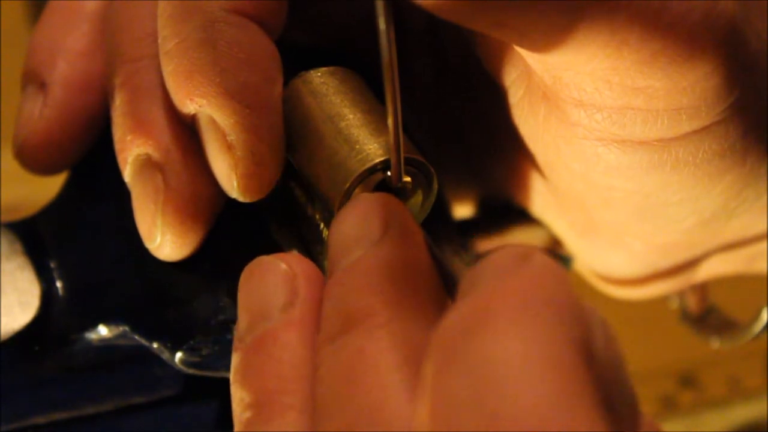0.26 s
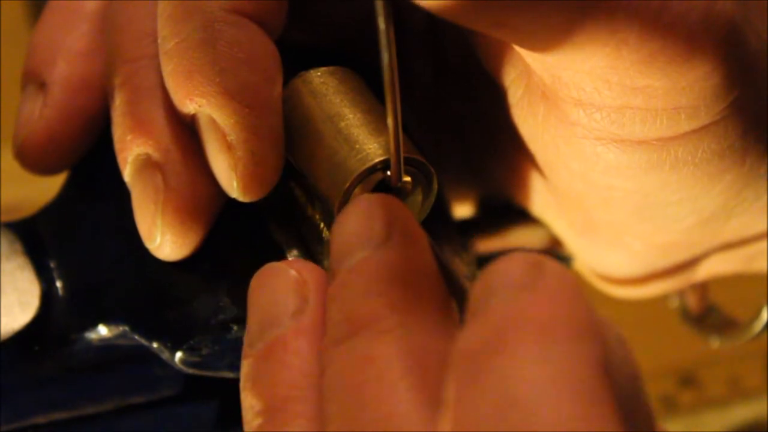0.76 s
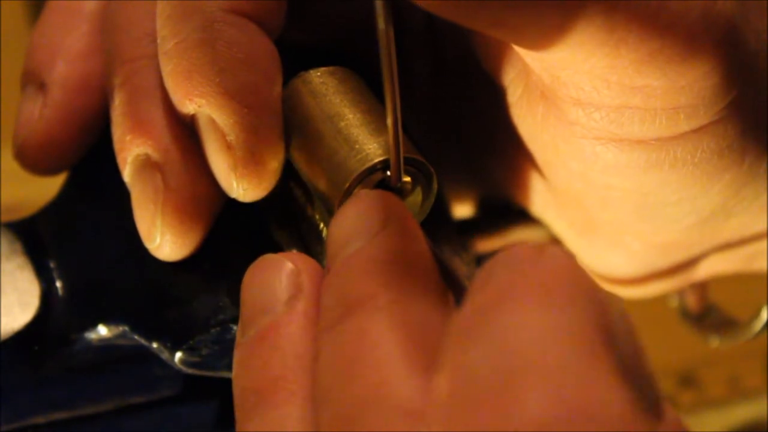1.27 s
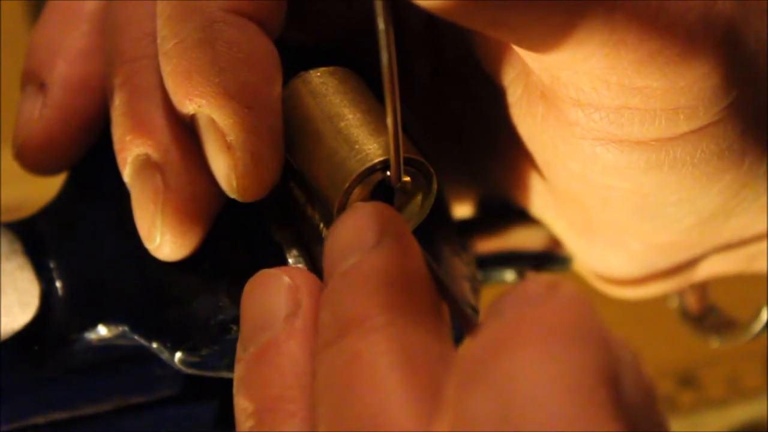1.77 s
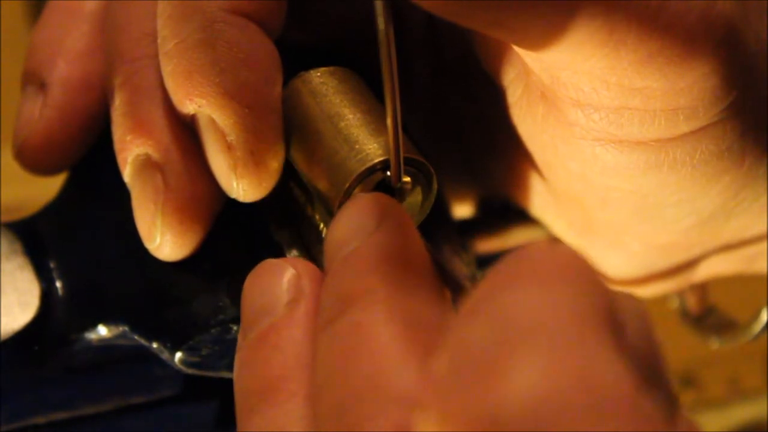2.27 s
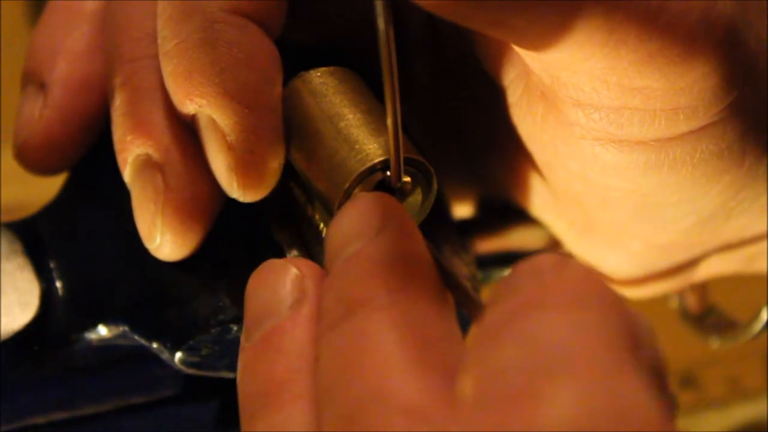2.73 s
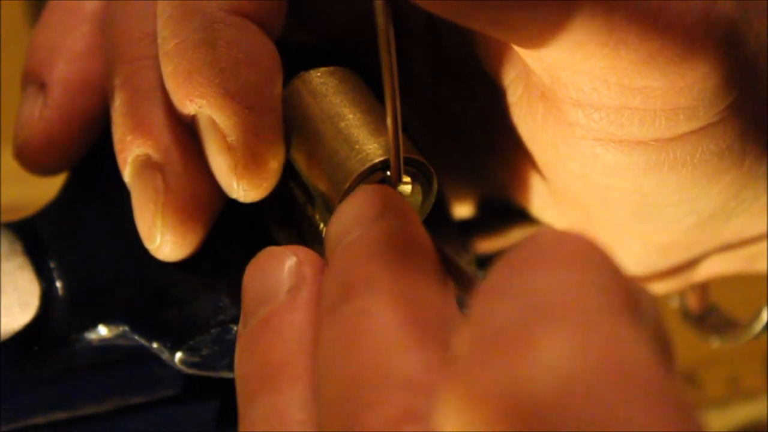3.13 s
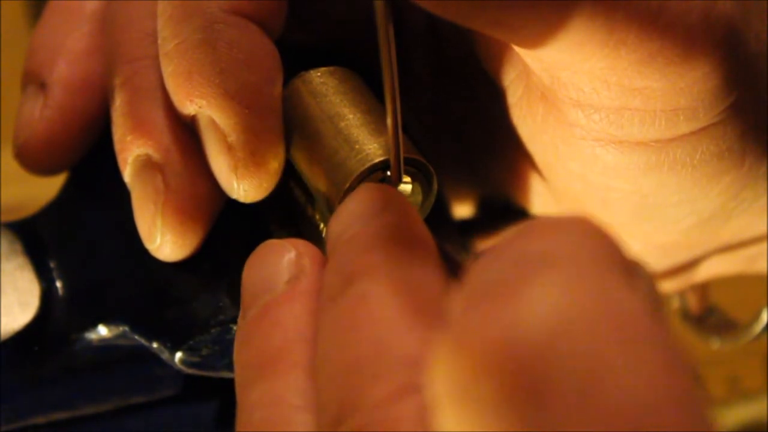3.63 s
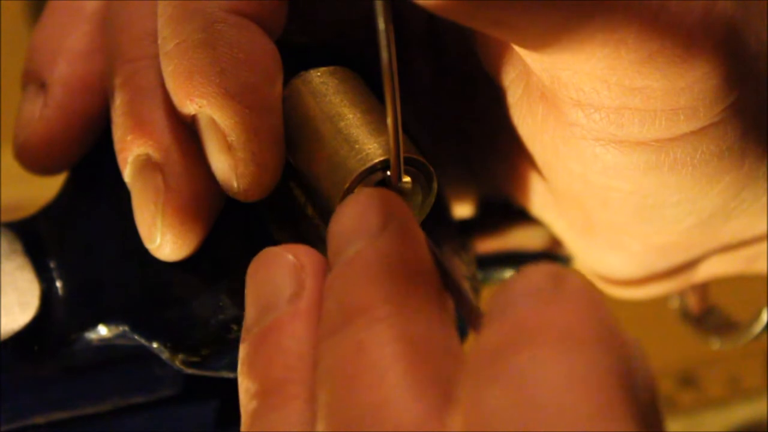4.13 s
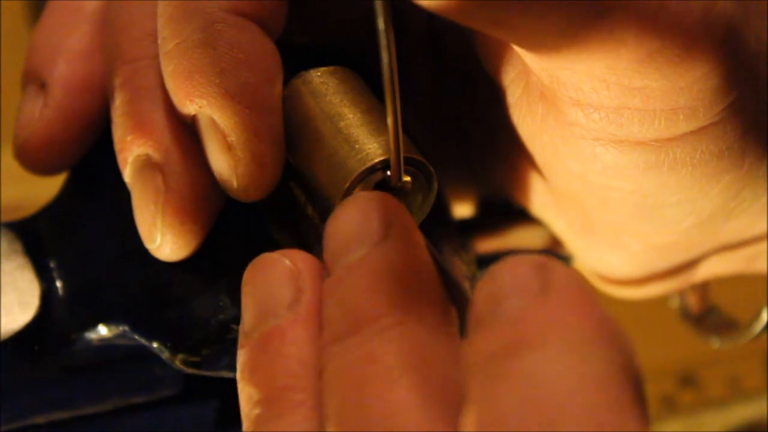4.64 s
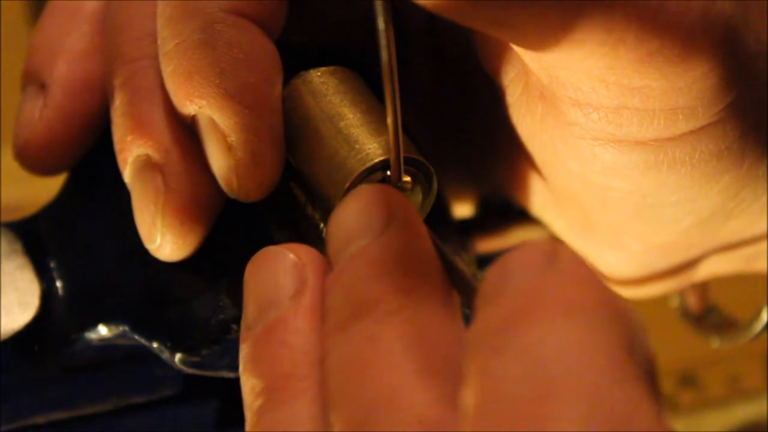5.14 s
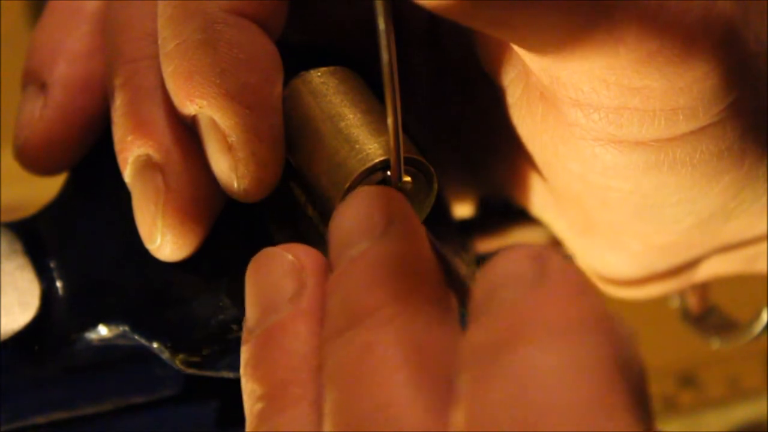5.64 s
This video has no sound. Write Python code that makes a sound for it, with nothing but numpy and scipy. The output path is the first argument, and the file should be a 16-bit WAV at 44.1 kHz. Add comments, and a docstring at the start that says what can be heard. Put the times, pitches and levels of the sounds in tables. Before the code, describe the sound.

A steel pick works the pins of a hand-held brass lock, close to the microphone in a small room. A sharp metallic snap comes near the start, followed by a softer click, a tiny squeak and scattered light ticks. Past the middle, a second strong click knocks the lock body, then small ticks continue. A fan hums faintly and steadily throughout.

```python
"""Picking a brass lock

A steel pick works the pins of a hand-held cylinder lock, close by. Bound pins slip, land and bounce,
knocking the lock body; between them the pick tip ticks and squeaks. A small room answers each click,
over the steady hum and air noise of a fan."""
import sys
import numpy as np
from scipy import signal
from scipy.fft import rfft, irfft, next_fast_len
from scipy.io import wavfile
from scipy.ndimage import uniform_filter1d

SR = 44100
rng = np.random.default_rng(int(sys.argv[2]) if len(sys.argv) > 2 else 0)


def master(y):
    """Save y as 16-bit WAV."""
    cut = np.clip(np.atleast_2d(y).T, -1, 1)
    pcm = np.round(cut * 32767)  # scale
    wavfile.write(sys.argv[1], SR, pcm.astype(np.int16))


N = 260190


def undb(db):
    """Decibels to gain."""
    return 10 ** (np.asarray(db) / 20)


def unit(x):
    """Scale to unit energy."""
    return x / np.sqrt(np.sum(x ** 2))


def colour(x, points):
    """Minimum-phase filter through (freq_hz, gain_db) points, via the folded cepstrum."""
    size = next_fast_len(len(x) + 4096, real=True)
    hz, db = np.transpose(points)
    bins_hz = np.maximum(np.fft.rfftfreq(size, 1 / SR), 1)
    gain = undb(np.interp(np.log(bins_hz), np.log(hz), db))
    cepstrum = irfft(np.log(gain), size)
    cepstrum[1:size // 2] *= 2
    cepstrum[size // 2 + 1:] = 0
    return irfft(rfft(x, size) * np.exp(rfft(cepstrum)), size)[:len(x)]


def drift(rate_hz):
    """Smooth random drift, spread about one."""
    hold = max(int(SR / rate_hz), 1)
    steps = np.repeat(rng.standard_normal(2048)[:N // hold + 1], hold)
    return uniform_filter1d(uniform_filter1d(steps, hold), hold)[:N] * np.sqrt(np.pi / 2)


def add(out, start_s, sound):
    """Mix a sound in at start_s."""
    start = max(int(start_s * SR), 0)
    out[start:start + len(sound)] += sound[:N - start]


def tone(hz, rms_db, wander_hz, flutter_db, flutter_hz):
    """Hum line wavering in pitch and level."""
    phase = 2 * np.pi * (rng.random() + np.cumsum(hz + wander_hz * drift(9)) / SR)
    return np.sqrt(2) * undb(rms_db + flutter_db * drift(flutter_hz)) * np.sin(phase)


def fan(air_rms_db=-55):
    """Strong blade tone, weaker machine tones, a thin whine and moving air."""
    # machine tones: pitch_hz, rms_db
    hum_lines = [(120, -79.5), (240, -75), (502, -70), (535, -76.5), (580, -72), (721.5, -76), (1080, -69),
                 (1156.4, -74), (1732, -72), (1771, -78.5), (1790.5, -72), (1938, -83), (2452, -77),
                 (2638, -78)]
    # air noise spectrum: freq_hz, relative_db
    air_spectrum = [(25, -18.5), (50, -16.5), (80, -8.5), (120, -6), (180, -3), (250, 0.5), (400, 0),
                    (560, 1), (850, -5.5), (1800, -8), (3000, -13.5), (6000, -16), (11000, -19),
                    (16000, -20.5)]
    blade = tone(hz=330.2, rms_db=-58, wander_hz=0.91, flutter_db=1, flutter_hz=20)
    hum = sum(tone(hz, db, wander_hz=3.52, flutter_db=3, flutter_hz=45) for hz, db in hum_lines)
    whine = tone(hz=11634, rms_db=-78.5, wander_hz=6, flutter_db=1.6, flutter_hz=25)
    air = unit(colour(rng.standard_normal(N), air_spectrum)) * np.sqrt(N)
    return blade + hum + whine + air * undb(air_rms_db + 0.21 * drift(5.39))


def squeaks(flutter_db=3):
    """Stick-slip of the pick tip on a pin: brief tones, unsteady in pitch and level."""
    # tip drags: start_s, length_s, pitch_hz, wander_hz, rms_db
    drags = [(0, .32, 4040, 170, -68), (1.59, .042, 5380, 30, -63), (1.63, .036, 5380, 30, -68)]
    out, bend, grip = np.zeros(N), drift(400), drift(149.7)
    for start_s, length_s, pitch_hz, wander_hz, rms_db in drags:
        span = slice(int(start_s * SR), int((start_s + length_s) * SR))
        phase = 2 * np.pi * np.cumsum(pitch_hz + wander_hz * bend[span]) / SR
        envelope = undb(rms_db + flutter_db * grip[span]) * np.sqrt(2 * np.hanning(len(phase)))
        add(out, start_s, envelope * np.sin(phase))
    return out


def contact(contact_ms, t):
    """Rough metal slipping on metal: a burst of micro-impacts, whitened."""
    age = t / (contact_ms / 1000)
    swell = age * np.exp(-age)
    spectrum = rfft(rng.standard_normal(len(t)) * swell)
    whitened = irfft(spectrum / (np.abs(spectrum) + 1e-12), len(t))
    return unit(whitened * np.exp(-age / 10))


def ring(modes, t, scatter_db=0.5):
    """Damped modes (freq_hz, width_hz, level_db); their balance varies per blow."""
    out = np.zeros(len(t))
    for hz, width_hz, db in modes:
        mode = unit(np.exp(-np.pi * width_hz * t) * np.cos(2 * np.pi * hz * t))
        out += undb(db - scatter_db * rng.standard_normal()) * mode
    return unit(out)


def click(level_db, contact_ms, body_db, pin_hz):
    """One contact cracks and rings pins, steel and lock body; the room answers."""
    # short rings of pick and pins: freq_hz, width_hz, level_db
    pin_modes = [(2890, 49, -7), (3485, 210, -3), (5030, 170, -1), (5750, 240, 1), (8110, 240, -3.5),
                 (10650, 250, -8), (11900, 160, -4.5), (12800, 160, -6), (13800, 170, 0.5)]
    # finger-damped brass body: freq_hz, width_hz, level_db
    body_modes = [(275, 14, -5), (413, 20, 1), (481, 15, 2.5), (787, 7.9, -6), (869, 28, -3),
                  (1126, 44, -4.5), (1450, 46, -6), (1614, 38, -0.5), (1880, 110, 0), (2225, 35, -3.5),
                  (2600, 560, -11)]
    # lasting ring of the free steel: freq_hz, level_db, t60_s
    steel_decays = [(1125, 4, .22), (3080, -4, .2), (3468, 3, .24), (3560, -1, .2), (4629, -6, .3),
                    (5292, -9, .22), (6164, -3, .22), (8168, 0, .18), (10240, 0, .2), (10579, -4, .2),
                    (12019, -2, .19), (12614, -5, .2), (12922, -3, .17)]
    # broad contact crack: freq_hz, level_db
    crack_spectrum = [(300, -20), (1200, -12), (2200, -3.5), (3450, 2.5), (7000, 0), (11000, 10.5),
                      (16000, -0.5)]
    t = np.arange(SR // 2) / SR
    # shorter or harder contacts are brighter; shorter ones favour a higher ring
    tilt_db_per_octave = 1.86 - 4.5 * np.log2(contact_ms / 0.3) + 0.08 * (level_db + 40)
    tilt = [(2000, 0), (16000, 3 * tilt_db_per_octave)]
    favoured_hz = 14700 / (1 + (contact_ms / 0.586) ** 2)
    favoured = undb(-6) * ring([(favoured_hz, 1400, 0)], t)
    crack = unit(colour(1. * (t == 0), crack_spectrum))
    pins = ring(pin_modes, t) + undb(-6) * ring([(pin_hz, 400, 0)], t)
    metal = pins + undb(-2) * crack + favoured
    body = undb(body_db) * ring(body_modes, t)
    steel_modes = [(hz, np.log(1000) / (np.pi * t60_s), db) for hz, db, t60_s in steel_decays]
    steel = undb(-12) * ring(steel_modes, t)
    direct = unit(colour(metal + steel, tilt)) + body
    # walls hear the lock from all sides: extra crack evens out its resonances
    radiated = unit(colour(metal + undb(-1) * crack, tilt)) + body
    sound = signal.fftconvolve(contact(contact_ms, t), direct + room(radiated, t))[:len(t)]
    return undb(level_db) * np.sqrt(SR / 1000) * sound  # level refers to energy over 1 ms


def room(x, t, build_s=0.001, low_t60_s=0.4, high_t60_s=0.26, split_hz=2500, send_db=-6):
    """Dense reflections from desk and near walls, new per contact; lows last longer."""
    # reflection colour: freq_hz, gain_db
    wall_colour = [(200, -2), (1000, 3.5), (3500, 5.5), (7000, 3), (12000, -4), (16000, -3)]
    noise = rng.standard_normal(len(t))
    low = signal.sosfiltfilt(signal.butter(2, split_hz, fs=SR, output="sos"), noise)
    tail = low * undb(-60 * t / low_t60_s) + (noise - low) * undb(-60 * t / high_t60_s)
    onset = 1 - np.exp(-t / build_s)
    response = colour(unit(tail * onset), wall_colour)
    return undb(send_db) * signal.fftconvolve(x, response)[:len(t)]


def picking(faint_tick_count=6, touch_body_db=-23, rebound_db=-11, rebound_contact_ratio=0.79):
    """Bound pins slip, fly, land and bounce once; the pick tip ticks, and fainter ticks fall at random."""
    # pins slipping free: start_s, slip_db, slip_contact_ms, flight_ms, landing_re_slip_db,
    # landing_contact_ms, bounce_delay_ms, body_re_click_db, pin_hz
    snaps = [ (0.4364, -15.5, .28, 2.93, -4, 0.43, 11, -28.5, 3570),
             (0.7945, -37.5, 0.32, 9.8, 1.5, 0.25, 5, -11, 10400),
             (3.6254, -25, 0.55, 25.0, -2, 0.2, 6, -5, 4800),
             (3.8028, -46, .5, 24.1, 4.5, 0.58, 5.6, -8, 4870),
             (5.3198, -43, 0.91, 17, -6, 1.4, 6, -4, 3500)]
    # tip touching a pin: start_s, level_db, contact_ms, pin_hz
    ticks = [(1.5372, -52, .28, 15000), (1.6203, -48, .5, 11900), (2.296, -45, 0.33, 14200),
             (2.3986, -42, 0.54, 13500), (2.6236, -42, .33, 10700), (3.228, -47.5, 0.3, 10900),
             (4.0837, -50, 0.42, 14500), (4.3276, -46.5, 0.32, 12300), (4.707, -42.5, .35, 12000),
             (5.883, -47, .25, 12400)]
    out = np.zeros(N)
    for start_s, slip_db, slip_ms, flight_ms, landing_db, landing_ms, delay_ms, body_db, pin_hz in snaps:
        landing_s = start_s + flight_ms / 1000
        bounce_s = landing_s + delay_ms / 1000
        bounce_db = slip_db + landing_db + rebound_db
        add(out, start_s, click(slip_db, slip_ms, body_db, pin_hz))
        add(out, landing_s, click(slip_db + landing_db, landing_ms, body_db, pin_hz))
        add(out, bounce_s, click(bounce_db, landing_ms * rebound_contact_ratio, body_db, pin_hz))
    for start_s, level_db, contact_ms, pin_hz in ticks:
        add(out, start_s, click(level_db, contact_ms, touch_body_db, pin_hz))
    for when, force, length in rng.random((faint_tick_count, 3)):
        faint_db = -52 + 1.5 * (2 * force - 1)
        faint_ms = 0.4 * (0.5 + length)
        add(out, when * N / SR, click(faint_db, faint_ms, touch_body_db, pin_hz=12000))
    # so small a body radiates no bass
    return signal.sosfilt(signal.butter(4, 200, "high", fs=SR, output="sos"), out)


def scene():
    """Lock and fan, alike in both channels."""
    return np.tile(picking() + squeaks() + fan(), (2, 1))


def record(dry):
    """Steep low-pass on the top treble."""
    cutoff_hz = 15850
    return signal.sosfilt(signal.ellip(10, .2, 70, cutoff_hz, fs=SR, output="sos"), dry)


dry = scene()
out = record(dry)
master(out)
```